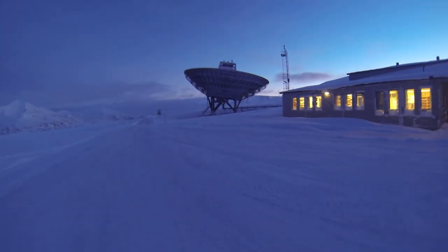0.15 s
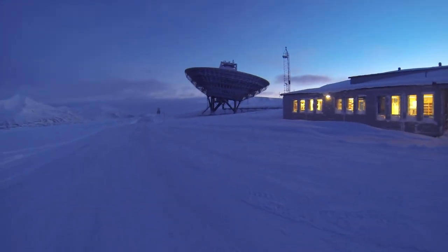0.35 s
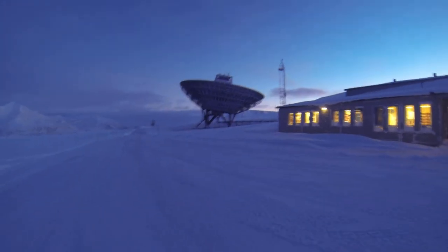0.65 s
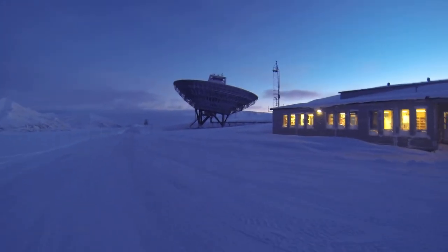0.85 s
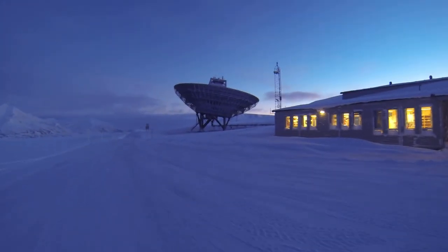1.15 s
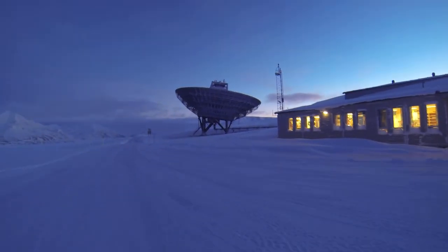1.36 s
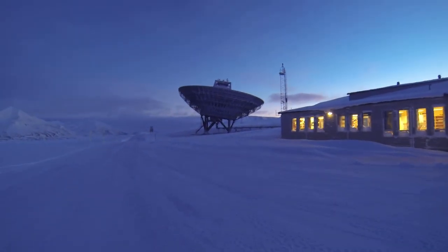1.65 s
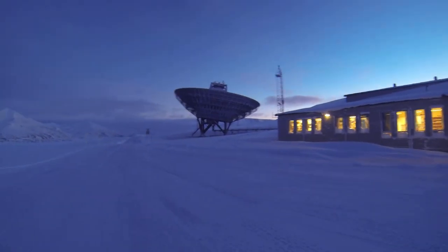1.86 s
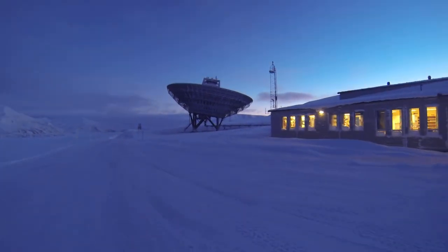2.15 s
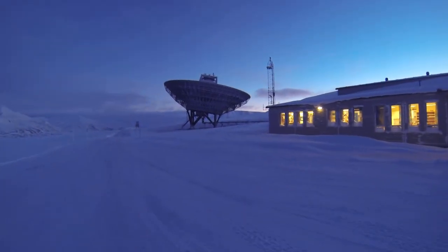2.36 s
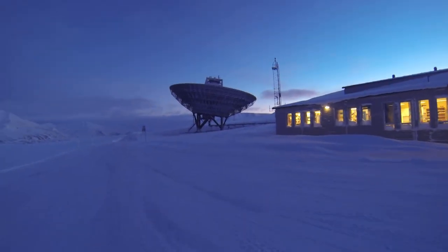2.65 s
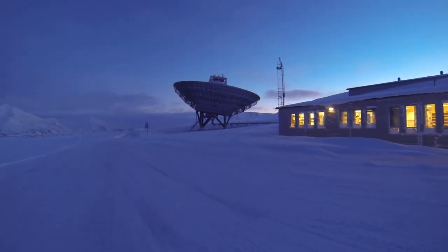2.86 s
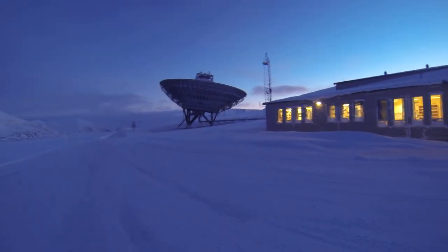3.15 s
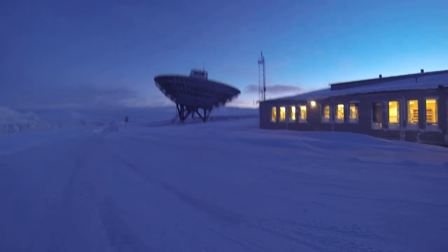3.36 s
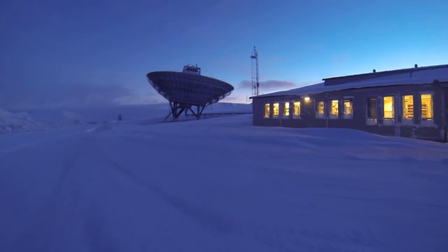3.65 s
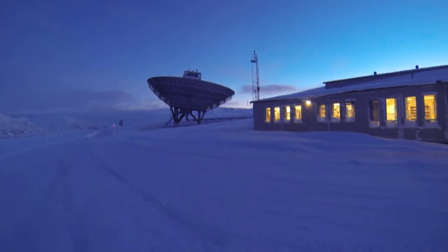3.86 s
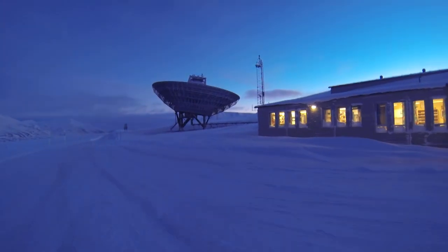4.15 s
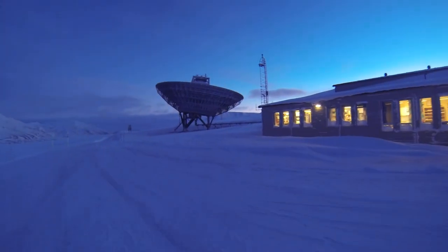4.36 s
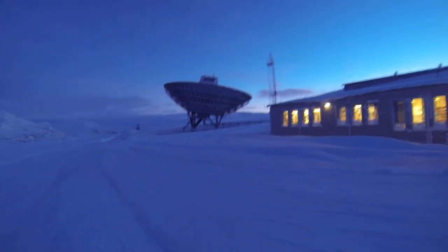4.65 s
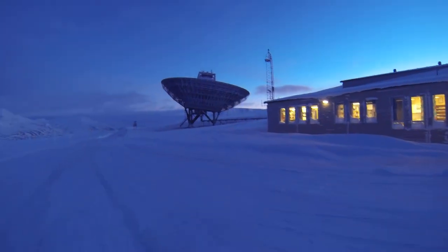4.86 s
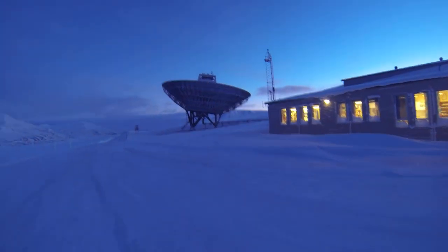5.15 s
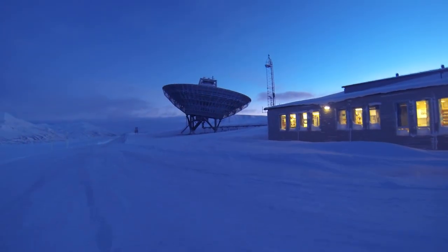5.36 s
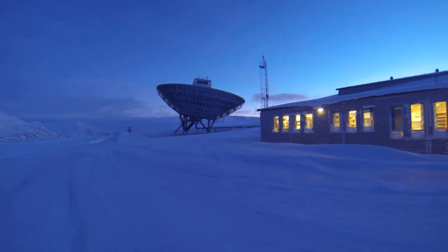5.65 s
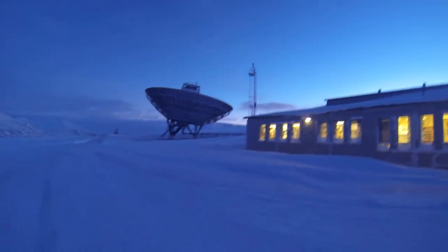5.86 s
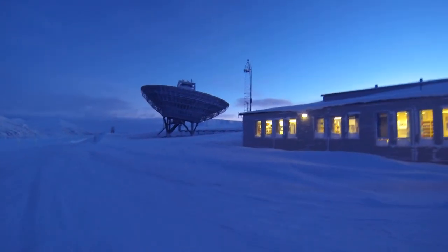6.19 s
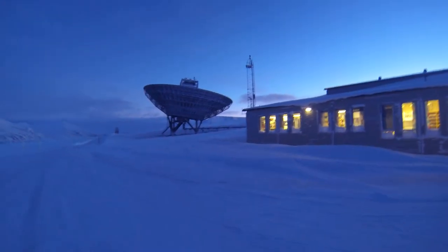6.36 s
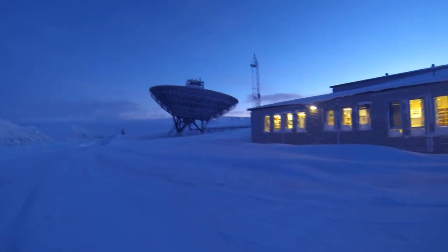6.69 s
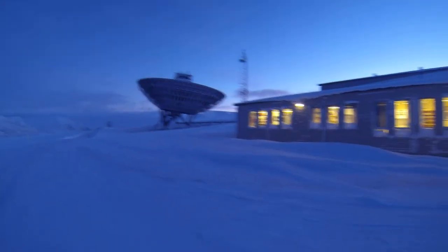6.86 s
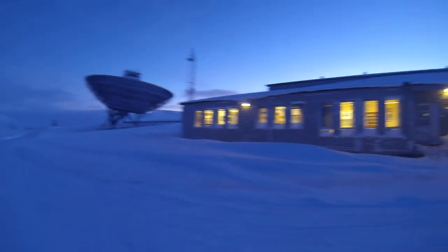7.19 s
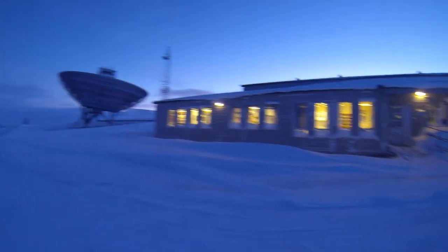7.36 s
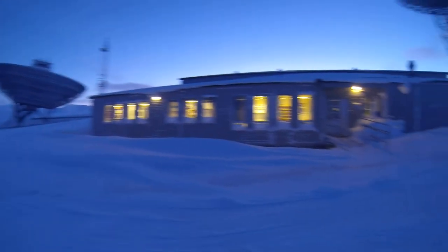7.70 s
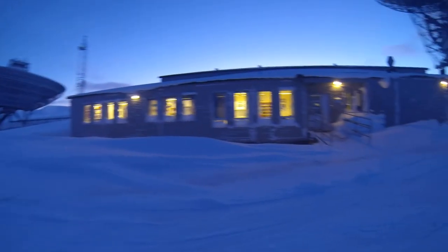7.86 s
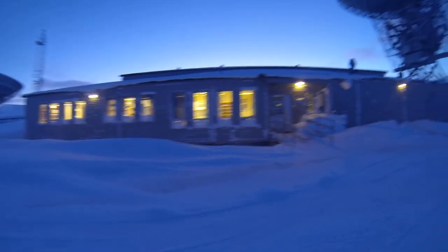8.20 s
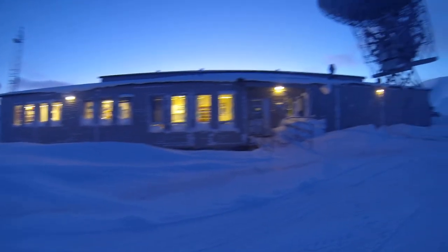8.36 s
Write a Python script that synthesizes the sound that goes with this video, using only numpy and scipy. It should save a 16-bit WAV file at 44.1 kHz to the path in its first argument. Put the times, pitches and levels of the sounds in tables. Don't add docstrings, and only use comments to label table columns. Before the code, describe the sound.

A gust and the tail of a squeaky step open the sound, then unhurried footsteps crunch through packed snow, heel to toe. Crackling creaks ring hollowly in the midrange, thickening in the second half, and fade to whispering creaks as the last boot lifts. Wind rumbles low against an enclosed mono microphone, with occasional bumps, soft hiss and tiny periodic whines. No echo.

```python
import sys
import numpy as np
from scipy import signal
from scipy.fft import rfft, irfft
from scipy.io import wavfile
from scipy.ndimage import uniform_filter1d

SR = 44100
rng = np.random.default_rng(int(sys.argv[2]) if len(sys.argv) > 2 else 0)


def convert_level_to_amplitude(level_db):
    exponent = np.asarray(level_db, float) / 20
    return 10 ** exponent


def int16_out(signal):
    q = np.round(np.clip(np.atleast_2d(signal).T, -1, 1) * 32767)
    wavfile.write(sys.argv[1], SR, q.astype(np.int16))


N = 376305
TIME = np.arange(N) / SR


def unit(x):
    return x / np.sqrt(np.mean(x ** 2))


def curves(table):
    s, *columns = np.transpose(table)
    return [np.interp(TIME, s, c) for c in columns]


def smooth(shape):
    s = TIME[::64]
    return [np.interp(TIME, s, row) for row in shape(s)]


def walk(rate):
    k = int(SR / rate)
    held = np.repeat(rng.standard_normal(N // k + 1), k)
    return unit(uniform_filter1d(uniform_filter1d(held, k), k)[:N])


def coloured(table):
    hz, db = np.transpose(table)
    f = np.maximum(np.arange(N // 2 + 1) * SR / N, .1)
    shape = convert_level_to_amplitude(np.interp(np.log(f), np.log(hz), db))
    return irfft(rfft(rng.standard_normal(N)) * shape, N)


def band(x, hz, width):
    return signal.lfilter(*signal.iirpeak(hz, hz / width, fs=SR), x)


def steep(x, modes):
    total = 0
    for k, (hz, width, db) in enumerate(modes):
        mode = band(band(band(x, hz, width), hz, width), hz, width)
        total = total + (-1) ** k * convert_level_to_amplitude(db) * mode
    return total


def even(x, span_s):
    span = int(span_s * SR)
    power = uniform_filter1d(uniform_filter1d(x ** 2, span), span)
    return x / np.sqrt(power + 1e-18)


def tame(x, top):
    power = uniform_filter1d(x ** 2, size=180)
    return x / (1 + (power / (top ** 2 * power.mean())) ** 2) ** .25


def add(out, s, piece):
    i = int(s * SR)
    out[i:i + len(piece)] += piece[:len(out) - i]


# (time [s], held [s], crunch [dB], brightness [dB])
PRESSES = [(0.309, 0.12, -51, -11), (0.515, 0.13, -52, -4), (0.93, 0.11, -57, -8),
           (1.147, 0.14, -52.5, -10), (1.548, 0.18, -56, -4), (1.77, 0.13, -55, -5), (2.021, 0.26, -56, -6),
           (2.389, 0.15, -48.5, -10), (2.869, 0.12, -57, -15), (3.004, 0.072, -51.5, -3),
           (3.167, 0.067, -50, -2), (3.41, 0.07, -59, -10), (3.53, 0.061, -60, -8),
           (3.642, 0.26, -49.5, -15), (4.299, 0.15, -53, -8), (4.493, 0.037, -49, -2),
           (4.739, 0.17, -55.5, -5), (4.982, 0.16, -51, -11), (5.342, 0.3, -57.5, -6),
           (5.687, 0.055, -51.5, -27), (5.771, 0.12, -46.5, -6), (6.082, 0.15, -56.5, -6),
           (6.359, 0.12, -48, -15), (6.496, 0.1, -50, -7), (6.713, 0.18, -64, -21.5),
           (7.06, 0.11, -52.5, -7), (7.178, 0.14, -50, -16), (7.504, 0.23, -57, -13),
           (7.816, 0.15, -53, -6), (8.282, 0.036, -63.5, -7), (8.499, 0.032, -66, -15.5)]
PRESS_DB_PER_S, LIFT_DB_PER_S = 145, 155
REST_DB, REST_BRIGHT_DB = -68, -3


def weight(t):
    power = convert_level_to_amplitude(2 * REST_DB)
    bright = power * REST_BRIGHT_DB
    for s, held, db, bright_db in PRESSES:
        before_s, after_s = np.maximum(s - t, 0), np.maximum(t - s - held, 0)
        press = convert_level_to_amplitude(2 * (db - PRESS_DB_PER_S * before_s - LIFT_DB_PER_S * after_s))
        power = power + press
        bright = bright + press * bright_db
    return 10 * np.log10(power), bright / power


def hush(rows, depth_db=-7, spread_s=.007):
    marks = np.zeros(N)
    marks[(rows[:, 0] * SR).astype(int)] = 1
    t = np.arange(-3 * spread_s, 3 * spread_s, 1 / SR)
    near_break = signal.fftconvolve(marks, np.exp(-.5 * (t / spread_s) ** 2), "same")
    return depth_db * np.minimum(near_break, 1)


# (frequency [Hz], width [Hz], level [dB])
CASE = [
    (1490, 405, 8.5),
    (1279, 265, 2.5),
    (2234, 520, -15),
    (2660, 550, -31),
    (3300, 1100, -26.5),
    (4770, 1530, -31.5),
    (840, 890, -10.5),
]


def crunch(load_db, bright_db, hush_db, slips_hz=85, faster=1.1, uneven=.5, spread_db=3.0, slip_ms=1.2,
           grind=0.2):
    chance = rng.standard_normal((6000, 2))
    strain = np.cumsum(slips_hz * convert_level_to_amplitude(faster * (load_db + 53.5))) / SR
    limits = np.cumsum(np.exp(uneven * chance[:, 0]))
    when = np.searchsorted(strain, limits[limits < strain[-1]])
    slips = np.zeros(N)
    slips[when] = convert_level_to_amplitude(spread_db * chance[:len(when), 1])
    fade = np.exp(-1000 / (slip_ms * SR))
    bursts = unit(signal.lfilter([1], [1, -fade], slips))
    rub = .5 + grind * convert_level_to_amplitude(load_db + 68)
    near = even((bursts + rub) * rng.standard_normal(N), 0.096)
    far = even((bursts + rub) * rng.standard_normal(N), 0.096)
    pocket = tame(steep(near, CASE[:2]), 1.5)
    shelf = tame(steep(far, CASE[2:4]), 1.5)
    walls = shelf * convert_level_to_amplitude(bright_db + 7.5) + steep(far, CASE[4:6]) * convert_level_to_amplitude(2.0)
    body = steep(near, CASE[6:])
    return (pocket * convert_level_to_amplitude(hush_db) + body + walls) * convert_level_to_amplitude(load_db + 0.5) / np.std(pocket)


# (time [s], peak [dB], ring [Hz], body [dB], shelf [dB])
CRACKS = [(0.2881, -30, 1510, -41, -26), (2.0536, -25.5, 1460, -18, -28), (2.3088, -22, 1423, -11, -34),
          (2.7763, -28, 1490, -23, -36), (2.8928, -28.5, 1547, -24, -34), (3.2064, -33, 1468, -15, -24),
          (3.5739, -30, 1440, -19, -20), (3.626, -29.5, 1350, -24, -22), (3.6495, -32, 1450, -18, -29),
          (3.6657, -30.5, 1408, -23, -24), (4.2871, -31.5, 1436, -14, -29), (4.3877, -30.5, 1470, -20, -28),
          (4.4146, -29.5, 1430, -15, -21), (4.4941, -25.5, 1490, -33, -24), (4.5357, -23, 1750, -13.5, -18),
          (4.9844, -28.5, 1477, -20, -29), (4.9973, -27.5, 1470, -14, -22), (5.0404, -28, 1440, -24, -29),
          (5.0697, -27, 1413, -30, -24), (5.0956, -26, 1468, -33, -27), (5.75, -31, 1470, -26, -24),
          (5.8474, -29.5, 1440, -20, -21), (6.1659, -29, 1392, -17, -20), (6.3152, -29.5, 1340, -25, -25),
          (6.3435, -28.5, 1380, -28, -28), (6.3596, -29, 1440, -23, -27), (6.3905, -27.5, 1390, -16, -29),
          (6.4181, -22, 1460, -25, -24), (6.4309, -27.5, 1543, -16, -15), (6.4527, -31, 1540, -24, -24),
          (6.4763, -28.5, 1526, -28, -13), (6.4905, -26.5, 1495, -24, -27), (6.6384, -28.5, 1490, -32, -19),
          (7.1786, -30.5, 1506, -25, -26), (7.3028, -31, 1450, -26, -26), (7.3478, -30, 1477, -20, -27),
          (7.5233, -31.5, 1400, -18, -25), (7.9682, -29, 1447, -19, -31), (7.9903, -28, 1400, -19, -23),
          (8.3443, -30, 1482, -27, -23)]
# (time [s], peak [dB], ring [Hz])
CREAKS = [(0.374, -33, 1470), (0.3871, -34, 1480), (0.5244, -33, 1420), (1.1564, -34.5, 1390),
          (1.5077, -34.5, 1508), (1.5618, -31, 1420), (1.6157, -34, 1420), (1.8909, -31, 1370),
          (2.1136, -32.5, 1490), (2.2297, -31.5, 1412), (2.3376, -36, 1390), (2.3544, -33, 1390),
          (2.5394, -32, 1510), (2.587, -34.5, 1495), (2.6234, -34.5, 1457), (2.6624, -34, 1450),
          (2.9181, -37.0, 1490), (2.941, -35, 1406), (2.9934, -32, 1505), (3.1469, -37, 1420),
          (3.1973, -30, 1470), (3.3756, -35.5, 1470), (3.5057, -33.5, 1470), (3.5443, -32.5, 1524),
          (3.6866, -34, 1520), (3.7195, -33, 1520), (3.7334, -34, 1540), (3.7816, -32, 1490),
          (3.8101, -34.0, 1434), (3.8218, -35, 1480), (3.8647, -41, 1540), (4.1429, -33.5, 1385),
          (4.3418, -36, 1385), (4.6975, -33.5, 1430), (4.7568, -32.5, 1437), (4.7897, -35, 1446),
          (4.8296, -32.5, 1533), (4.9343, -30, 1447), (4.97, -31, 1510), (5.0157, -32, 1380),
          (5.1074, -36, 1490), (5.6195, -33.5, 1456), (5.6653, -36.5, 1350), (5.6925, -33, 1382),
          (5.7145, -34, 1480), (6.2098, -34.5, 1517), (6.289, -29.5, 1470), (6.3738, -38, 1405),
          (6.5429, -31.5, 1507), (6.5941, -32, 1516), (7.072, -34, 1489), (7.0872, -40, 1488),
          (7.0971, -34, 1490), (7.1556, -32, 1450), (7.191, -33, 1488), (7.6256, -33.5, 1452),
          (7.6956, -35, 1463), (7.8119, -36.5, 1510), (7.8412, -33, 1457), (7.8678, -32.5, 1422)]
# (time [s], peak [dB], ring [Hz])
FAINT = [(0.21, -43, 1460), (0.2347, -38, 1460), (0.2603, -37, 1550), (0.491, -37.5, 1520),
         (0.8669, -41, 1490), (0.9551, -47, 1485), (1.372, -39.5, 1460), (1.7237, -38, 1560),
         (1.9273, -34, 1490), (1.9511, -37, 1420), (1.9846, -35.5, 1430), (2.1705, -37.5, 1510),
         (2.267, -36, 1400), (2.288, -36, 1509), (3.3266, -43, 1450), (3.4005, -37, 1330),
         (3.4225, -39, 1524), (3.448, -37, 1400), (3.611, -33, 1457), (3.9635, -36.5, 1470),
         (4.071, -41.5, 1420), (4.2212, -43, 1366), (4.2574, -37.5, 1490), (4.3218, -37, 1380),
         (4.3625, -37, 1410), (4.58, -34, 1473), (4.5955, -39, 1446), (4.8606, -38, 1520),
         (4.8898, -42, 1490), (5.2432, -38, 1458), (5.265, -37.5, 1413), (5.4611, -36.5, 1484),
         (5.568, -38, 1346), (5.6818, -37, 1412), (5.7255, -38, 1456), (6.8163, -44.0, 1426),
         (6.855, -37, 1490), (6.899, -39, 1450), (6.9457, -41.5, 1557), (6.9934, -38.5, 1533),
         (7.0356, -34.5, 1530), (7.0598, -39, 1463), (7.371, -39, 1490), (7.398, -37, 1460),
         (7.4463, -38.5, 1416), (7.4832, -41, 1380), (7.5886, -36, 1400), (7.654, -37, 1430),
         (7.7278, -42, 1468), (7.7555, -40, 1420), (7.78, -37, 1384), (8.0434, -39, 1580),
         (8.0725, -45, 1520), (8.266, -39, 1490), (8.298, -41, 1490), (8.3874, -42, 1490),
         (8.445, -42, 1440), (8.4685, -35, 1440), (8.5035, -46, 1380), (8.5227, -38, 1460)]
PACKED = [.328, .341, 0.349, .36, 0.409, .445, .5184, .553, .598, .635, 1.236, 1.268, 1.66, 1.855, 1.884,
          2.328, 2.332, 2.412, 2.434, 2.483, 2.5106, 3.0226, 3.099, 3.1392, 3.2146, 3.6775, 3.711, 3.755,
          3.764, 3.7758, 3.8017, 3.9028, 4.3318, 4.4252, 4.482, 4.523, 4.8, 5.1256, 5.1473, 5.7032, 5.785,
          5.8053, 5.88, 6.176, 6.339, 6.4427, 6.5012, 6.51, 6.56, 6.5846, 6.6295, 7.138, 7.2083, 7.7975,
          7.8465, 1.751, 7.914, 7.937]
HARD = [2.4301, 5.0483, 5.7915, 5.8602, 5.8751, 6.4124, 6.4824, 7.3412]
SOFT = [8.25, 8.315, 8.41, 8.429]
PACKED_DB, HARD_DB, SOFT_DB = -36.5, -31.5, -43
PACKED_HZ, PACKED_SPREAD_HZ = 1480, 42
CREAK_BODY_DB, CREAK_SHELF_DB, CREAK_SPREAD_DB = -24, -23, 3


def breaks():
    packed = []
    for times, db in ((PACKED, PACKED_DB), (HARD, HARD_DB), (SOFT, SOFT_DB)):
        packed += [(s, db, PACKED_HZ) for s in times]
    small = np.r_[CREAKS, FAINT, packed]
    luck = np.resize(rng.standard_normal((140, 2)), (len(small), 2))
    small[-len(packed):, 2] += PACKED_SPREAD_HZ * luck[:len(packed), 0]
    levels = CREAK_SPREAD_DB * luck + [CREAK_BODY_DB, CREAK_SHELF_DB]
    return np.r_[CRACKS, np.c_[small, levels]]


def cracks(rows, rise_ms=1.35, fall_ms=1.84, round_ms=0.58, wander=0.37):
    out, t = np.zeros(N), np.arange(-300, 500) / SR
    turn = np.resize(rng.random((180, 4)), (len(rows), 4))
    for (s, db, hz, body_db, shelf_db), (a, b, c, d) in zip(rows, turn):
        u = 1000 * t / (.62 if body_db > -13 else 1)
        shape = np.exp((round_ms - np.hypot(u, round_ms)) / np.where(t < 0, rise_ms, fall_ms))
        drift = wander * np.sin(2 * np.pi * ((120 + 120 * c) * t + d))
        pocket = np.sin(2 * np.pi * (hz * t + a) + drift)
        shelf = np.sin(2 * np.pi * (CASE[2][0] * (0.94 + 0.22 * a) * t + b))
        body = np.sin(2 * np.pi * (CASE[6][0] * (0.67 + 0.44 * c) * t + d))
        ring = pocket + convert_level_to_amplitude(body_db) * body + convert_level_to_amplitude(shelf_db) * shelf
        add(out, max(s - .0058, 0), convert_level_to_amplitude(db - 5.0) * shape ** (0.85 + .5 * b) * ring)
    return out


def ending_step():
    return convert_level_to_amplitude(-41.0) * np.sin(2 * np.pi * 1500 * TIME) * np.exp(-(TIME / 0.016) ** 4)


# (time [s], peak [dB], frequency [Hz])
TICKS = [(1.528, -60, 3700), (1.7244, -45, 2800), (2.3301, -66, 3360), (2.397, -57, 3120),
         (3.0065, -53, 3080), (3.151, -55, 2845), (3.3833, -59, 3330), (3.7787, -53.5, 3960),
         (4.5356, -54, 2920), (4.9315, -56, 2847), (4.969, -59, 3080), (5.242, -53.5, 3300),
         (5.2968, -62, 3020), (5.542, -56, 3234), (5.664, -50.5, 3300), (5.8402, -71, 2930),
         (5.874, -54, 3090), (5.924, -57, 3360), (6.464, -63, 3330), (7.655, -49.5, 2950),
         (7.839, -59, 3350), (7.88, -58, 3045)]


def ticks(tick_ms=0.85):
    out, t = np.zeros(N), np.arange(400) / SR
    u = t / (tick_ms / 1000)
    pulse = u * np.exp(1 - u)
    for (s, db, hz), grit in zip(TICKS, rng.standard_normal((len(TICKS), len(t)))):
        tone = np.sin(2 * np.pi * hz * t)
        add(out, s, convert_level_to_amplitude(db) * pulse * (tone + 0.8 * band(grit, 5400, 1000)))
    return out


# (time [s], peak [dB])
SPARKS = [(1.2615, -61), (5.924, -64), (1.3286, -55), (3.7783, -56), (4.3276, -61), (5.154, -57),
          (5.298, -60), (5.3762, -56), (5.6493, -61), (6.6193, -60), (6.688, -85), (7.033, -65),
          (7.5498, -63)]


def sparks():
    out, t = np.zeros(N), np.arange(100) / SR
    for (s, db), grit in zip(SPARKS, rng.standard_normal((len(SPARKS), 100))):
        add(out, s, convert_level_to_amplitude(db) * np.diff(grit, prepend=0) * np.exp(-t / 0.0015))
    return out


# (time [s], held [s], level [dB])
SCRAPES = [(0.549, .03, -73), (1.721, 0.018, -67), (1.8, 0.11, -76), (2.4, 0.034, -74), (2.53, 0.05, -71),
           (3.0, 0.028, -62), (3.14, 0.029, -67), (3.38, 0.067, -65), (3.8, 0.1, -73), (4.491, 0.059, -75),
           (4.93, 0.023, -78), (5.66, 0.022, -69), (5.829, 0.086, -78), (7.651, 0.022, -67.5),
           (7.84, 0.042, -72)]
# (frequency [Hz], width [Hz], level [dB])
SCRAPE_WALL = [
    (3300, 510, 0.5),
    (4800, 1100, -16.5),
    (2430, 1070, -2.5),
]
# (time [s], held [s], level [dB])
SCUFFS = [
    (2.0, .2, -67),
    (4.68, .2, -64),
    (5.5, 0.22, -65),
    (6.1, 0.22, -64.5),
    (6.695, 0.034, -63),
    (.92, 0.039, -70),
]
# (frequency [Hz], width [Hz], level [dB])
SCUFF_WALL = [
    (956, 400, 1),
    (696, 250, -7),
]
# (time [s], held [s], level [dB])
SQUEALS = [
    (.34, .07, -71),
    (.44, .13, -65.5),
    (1.15, 0.085, -67),
    (2.37, 0.21, -68),
    (3.66, 0.28, -67),
    (5.04, 0.17, -70),
    (6.37, 0.25, -65.5),
    (7.15, 0.17, -71.5),
]
# (frequency [Hz], width [Hz], level [dB])
SQUEAL_WALL = [
    (2234, 370, 0.5),
    (2580, 470, -6),
]


def scrapes(rows, wall, grit_db=4.5, edge_db_per_s=400):
    def gates(t):
        total = 0
        for s, held, db in rows:
            away_s = np.maximum(np.maximum(s - t, t - s - held), 0)
            total = total + convert_level_to_amplitude(db - edge_db_per_s * away_s)
        return [total]
    gate, = smooth(gates)
    rasp = steep(convert_level_to_amplitude(grit_db * walk(300)) * rng.standard_normal(N), wall)
    return unit(tame(rasp, 1.5)) * gate


# (time [s], peak [dB], thump [dB], push [ms], below 0 a pull)
KNOCKS = [(0.628, -63, -41, 1.5), (1.7213, -50, -33.5, -2), (1.889, -37.5, -66, 1.2), (2.306, -46, -52, 0),
          (2.786, -42.5, -49.5, 2.5), (3.1466, -37.5, -60, 3.1), (3.149, -37, -34, 1), (3.333, -61, -42, 1),
          (3.398, -38.5, -41, 1.5), (4.252, -50, -40, 2.65), (4.283, -50, -65, -0.2),
          (4.5337, -30.5, -31.5, 0.62), (4.9336, -42, -34, -0.5), (5.325, -64, -36.5, 0),
          (5.766, -51, -50, 4), (6.054, -67, -38, 1.5), (6.426, -41, -49, 2), (6.562, -61, -35, -0.6),
          (6.976, -47, -40, 2), (7.128, -39, -38.5, 1.2), (7.88, -51, -34, -1.2), (8.3296, -36, -33, -2),
          (8.395, -65, -39, 2.4)]


def knocks(shell_hz=160, shell_t60=0.097):
    out, dent, t = np.zeros(N), np.zeros(N), np.arange(4000) / SR
    boom = np.sin(2 * np.pi * shell_hz * t) * np.exp(-np.log(1000) * t / shell_t60)
    for s, db, thump_db, ms in KNOCKS:
        push = np.exp(-.5 * ((t - .0025) / (max(abs(ms), .3) / 4000)) ** 2)
        add(dent, s, -np.sign(ms) * convert_level_to_amplitude(db + 7.5) * push)
        add(out, s, -np.sign(ms) * convert_level_to_amplitude(thump_db) * boom)
    wall = convert_level_to_amplitude(-19.0) * band(dent, 850, 230)
    dip = 0.75 * band(dent, 600, 270)
    pocket = convert_level_to_amplitude(6.5) * band(dent, 1700, 300)
    return out + dent + wall - dip + pocket


# (time [s], buffet [dB], flutter [dB])
GUST = [(0.05, -19, -44), (0.36, -36.5, -62.5), (0.59, -32, -37), (0.83, -32.5, -47.5), (3.0, -31, -48.5),
        (3.29, -35, -48.5), (3.38, -36.5, -57), (4.65, -34.5, -47), (4.7, -31, -45), (6.02, -29, -39.5),
        (6.47, -40, -45), (6.5, -31, -42.5), (8.36, -35.5, -51.5), (8.53, -40.5, -57)]
# (time [s], buffet gain [dB], flutter gain [dB])
PUFFS = [(.31, -5, 3), (.43, 3.5, 4.5), (0.618, 5.5, -2.5), (.88, 4, 2.5), (1.21, 4.5, -1), (1.52, -2.5, 5),
         (1.71, 1, -4), (2.12, 1, 7.5), (2.25, -6.5, -8), (2.73, -2, -2), (2.9, -3, 5), (3.161, 4, -2),
         (3.43, -9.5, 2.5), (3.66, -5, 0), (3.82, 5.5, 2.5), (4.349, 5.5, 2), (4.56, 3, -3),
         (4.95, -5, -2.5), (5.55, -4.5, 2.5), (5.64, 3.5, -4.5), (5.96, 3, 1.5), (6.6, 0.5, 4),
         (7.01, 1.5, -9), (7.24, 3, 1.5), (7.6, -4, 5), (7.95, -7, 3.5), (8.13, 2.5, -7), (8.37, 2.5, 0),
         (.1, -15, 1.5), (.76, -6, -3), (1.05, -1.5, 4), (1.9, 3, -1.5), (2.4, -4, -6), (2.56, -2.5, 1.5),
         (3.32, 4, 0), (4.1, -4.5, -0.5), (4.799, -3, 2), (6.4, 2.5, -2.5), (7.4, -4.5, -1),
         (7.749, 3.5, -1.5)]
# (frequency [Hz], density [dB per Hz])
WIND = [(2.9, -50), (5.0, 1.5), (16, 1.5), (25, -6), (92, -20.5), (161, -22.5), (215, -34.5), (493, -42.5),
        (700, -49), (910, -75), (1540, -120)]


def puff_gains(t, puff_s=0.052):
    return sum(np.outer(db, np.exp(-.5 * ((t - s) / puff_s) ** 2)) for s, *db in PUFFS)


def wind(split_hz=62, flicker_db=1.77, reach=0.15, follow=0.31):
    buffet_db, flutter_db = curves(GUST)
    puffs = smooth(puff_gains)
    heaves = 1.2 * walk(14)
    buffet_db = buffet_db + puffs[0] + heaves
    flutter_db = flutter_db + puffs[1] + .6 * walk(6) + follow * heaves
    air = coloured(WIND)
    slow = signal.sosfiltfilt(signal.butter(4, split_hz, fs=SR, output="sos"), air)
    edges = [split_hz, 110, 200, 400, 900]
    shared = 1.54 * walk(22)
    bands = []
    for lo, hi in zip(edges, edges[1:]):
        eddy = signal.sosfiltfilt(signal.butter(2, [lo, hi], "band", fs=SR, output="sos"), air)
        bands.append(eddy * convert_level_to_amplitude(shared + flicker_db * walk(26)))
    steady = even(sum(bands), 0.25) / (sum(bands) + 1e-18)
    swell_db = flutter_db - flutter_db.mean()
    quick = sum(b * convert_level_to_amplitude(flutter_db - 2 - reach * k * swell_db) for k, b in enumerate(bands)) * steady
    letting_go = .09 * np.exp(-TIME / .012)
    return even(slow, 0.098) * convert_level_to_amplitude(buffet_db) + quick + letting_go


# (time [s], peak [dB], width [ms], push +1 or pull -1)
SLAPS = [(3.342, -30, 2.4, 1), (4.935, -31.5, 4.6, 1), (5.052, -35, 3.9, -1), (5.776, -32, 4.2, -1),
         (5.883, -30, 4.9, -1), (5.958, -23.5, 4.8, -1), (6.572, -33, 3.5, 1), (7.881, -30.5, 4.3, 1),
         (8.108, -31, 4.9, 1), (1.728, -32.5, 3, 1), (4.563, -20, 28.8, 1), (3.157, -34, 3.7, 1)]


def slaps():
    out, t = np.zeros(N), np.arange(-6000, 6000) / SR
    for s, db, ms, sense in SLAPS:
        u = (1000 * t / ms) ** 2
        add(out, s + t[0], np.sign(sense) * convert_level_to_amplitude(db) * (1 - u) * np.exp(-u / 2))
    return out


# (frequency [Hz], density [dB per Hz])
HISS = [(300, -0.5), (500, -7), (950, -4.5), (1300, -3), (1480, -2.5), (1700, -8), (2050, -9.5),
        (3200, -11.5), (4000, -14.5), (6300, -18), (9300, -22.5), (10200, -22), (11400, -25),
        (13600, -22.5)]
# (time [s], level [dB])
WHINE = [
    (.325, -83),
    (1.332, -78),
    (2.429, -78),
    (3.45, -75),
    (4.58, -76),
    (5.77, -76),
    (6.76, -75),
    (7.85, -75),
]


def circuit(hiss_db=-62.5, whine_hz=6770, whine_s=0.025):
    hiss = unit(coloured(HISS)) * convert_level_to_amplitude(hiss_db)
    gate = sum(convert_level_to_amplitude(db) * np.exp(-((TIME - s) / whine_s) ** 4) for s, db in WHINE)
    phase = 2 * np.pi * whine_hz * TIME + 2.1 * walk(43)
    whine = gate * (np.sin(phase) + 0.58 * np.sin(2 * phase))
    line = convert_level_to_amplitude(-98) * np.sin(2 * np.pi * 13642 * TIME)
    return hiss + whine + line


def scene():
    load_db, bright_db = smooth(weight)
    rows = breaks()
    shuffle_db = 1.62 * walk(14)
    snow = crunch(load_db + shuffle_db, bright_db, hush(rows))
    snow = snow + cracks(rows) + ending_step() + ticks() + sparks()
    snow = snow + scrapes(SCRAPES, SCRAPE_WALL)
    snow = snow + scrapes(SCUFFS, SCUFF_WALL, 2.6)
    snow = snow + scrapes(SQUEALS, SQUEAL_WALL, 6.7)
    air = wind() + slaps() + circuit()
    return (snow + knocks() + air)[None]


def roll_off(x):
    return signal.sosfilt(signal.butter(12, 15310, fs=SR, output="sos"), x)


def record(dry):
    return roll_off(dry)


dry = scene()
out = record(dry)
int16_out(out)
```